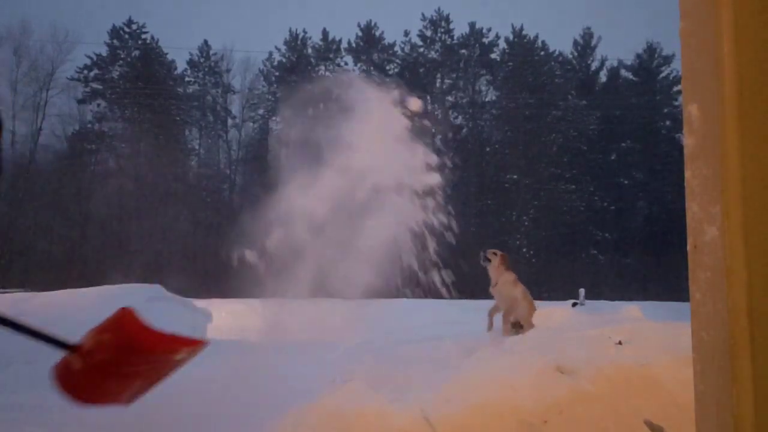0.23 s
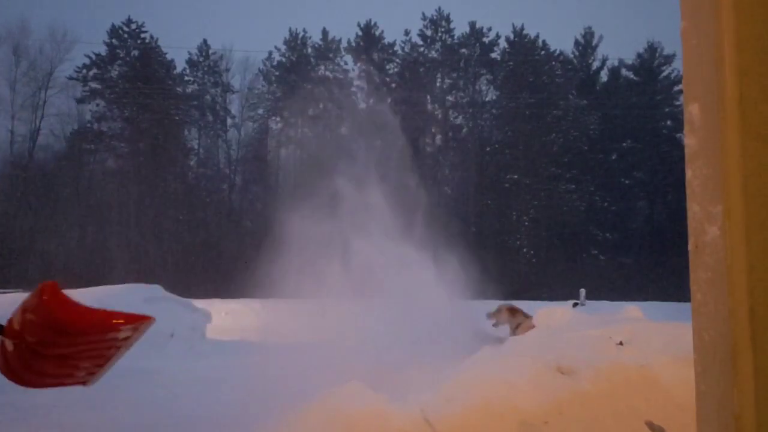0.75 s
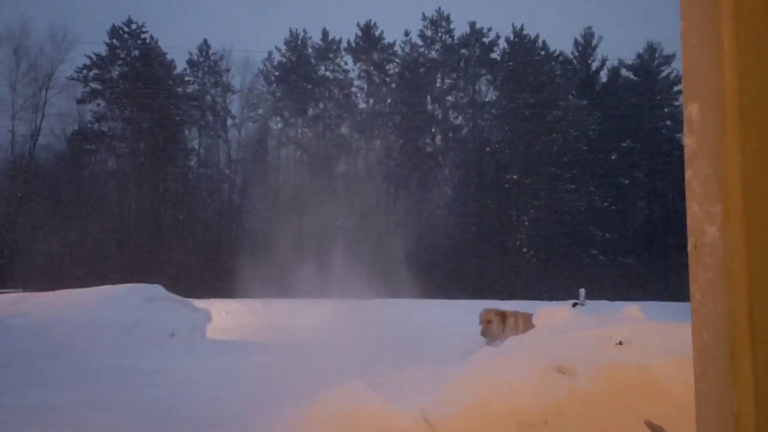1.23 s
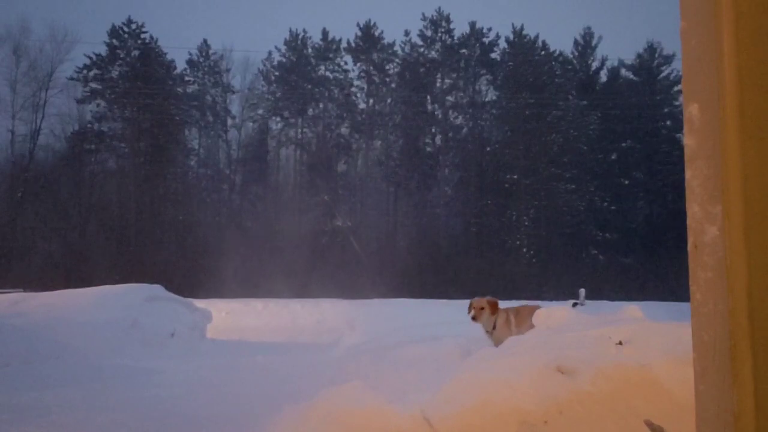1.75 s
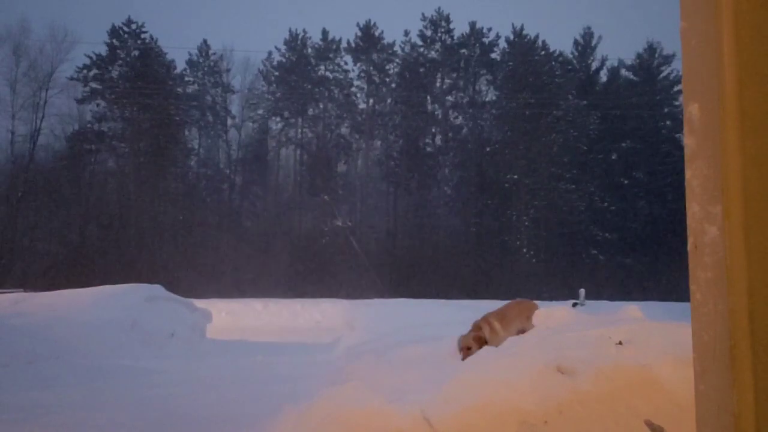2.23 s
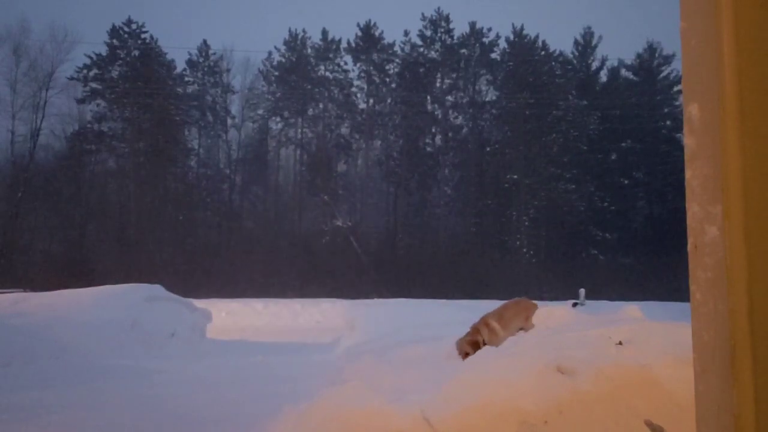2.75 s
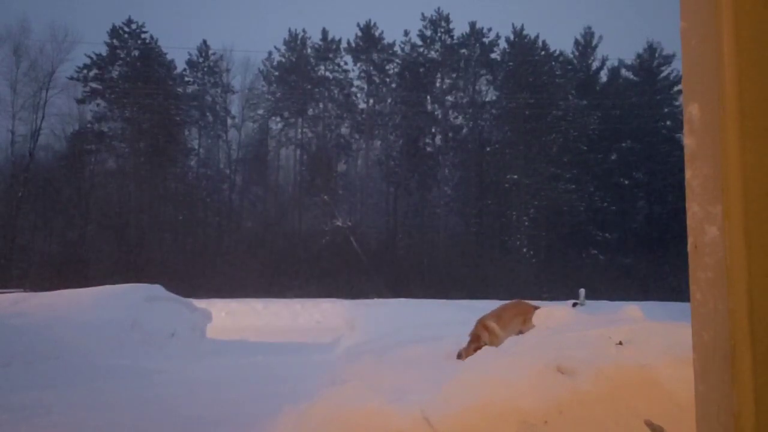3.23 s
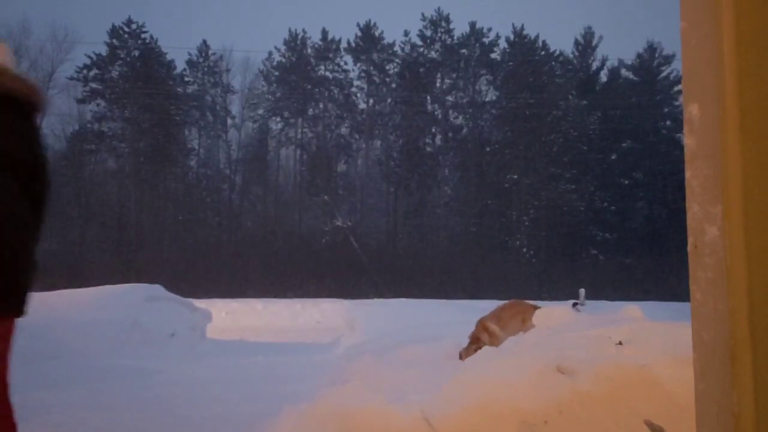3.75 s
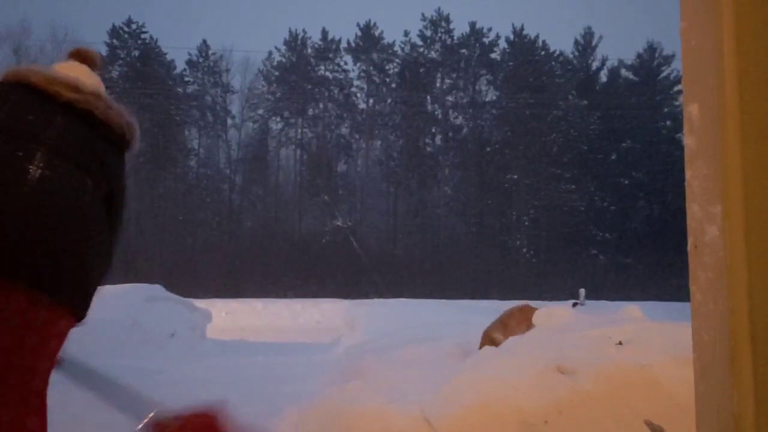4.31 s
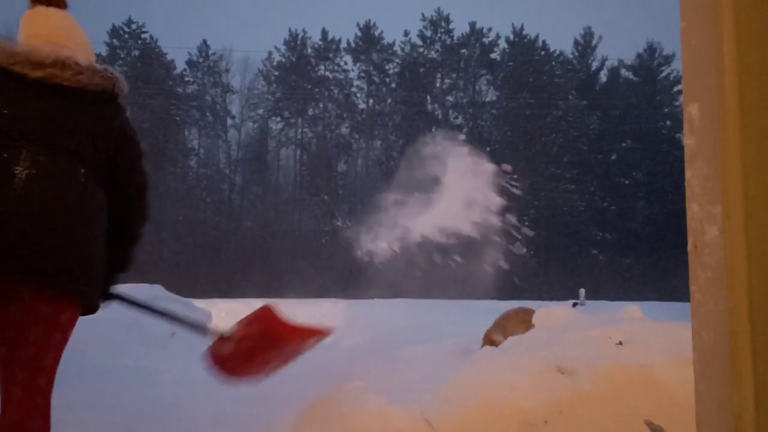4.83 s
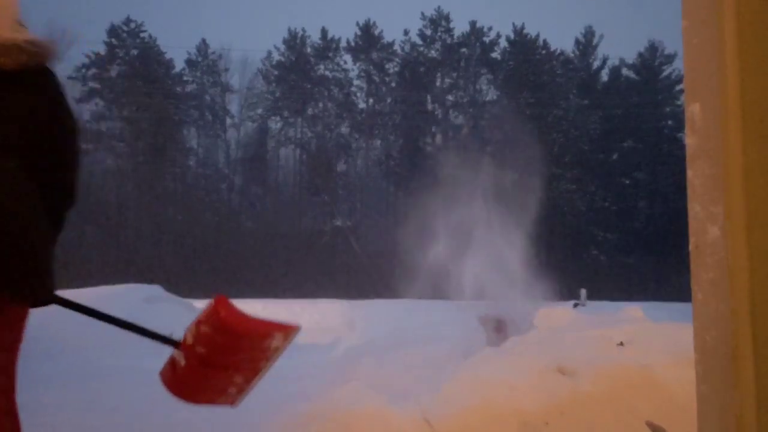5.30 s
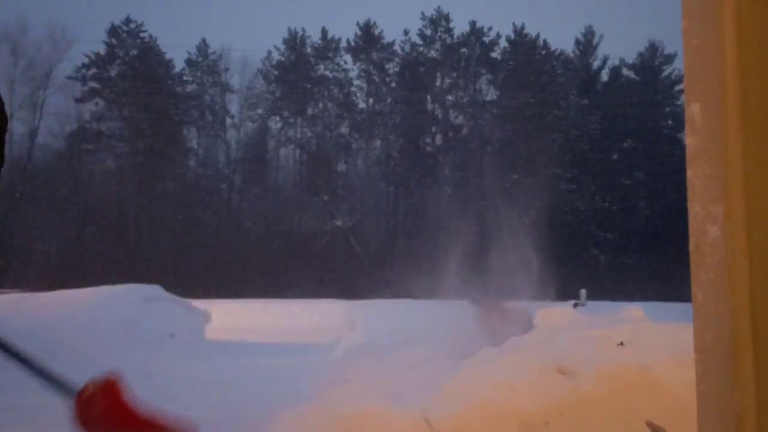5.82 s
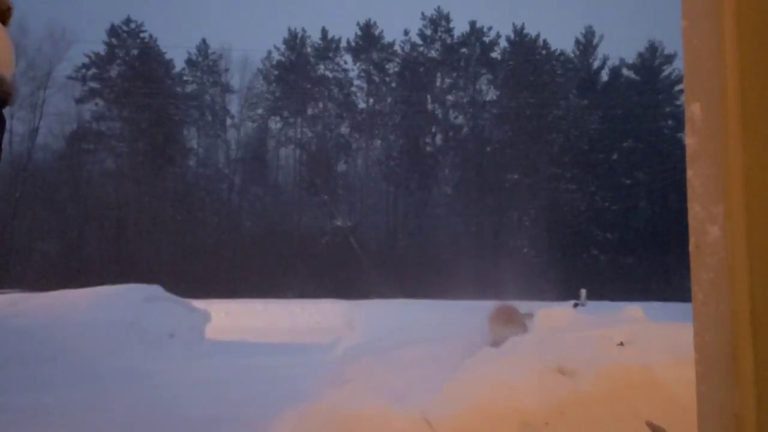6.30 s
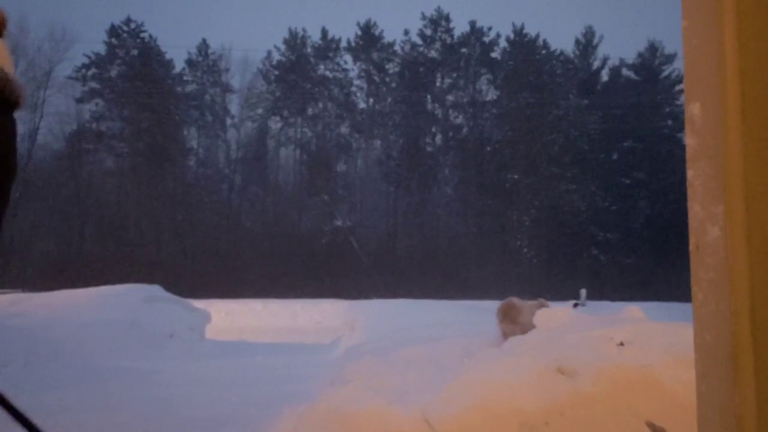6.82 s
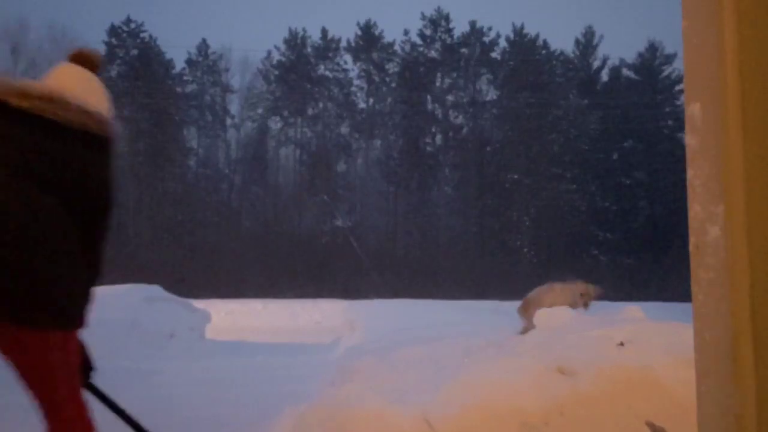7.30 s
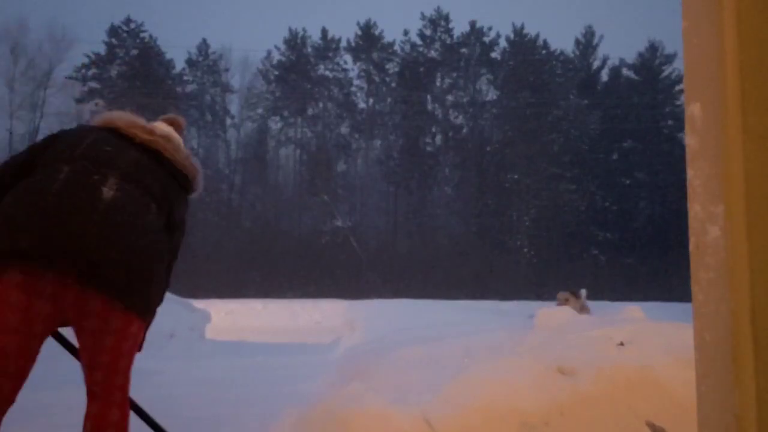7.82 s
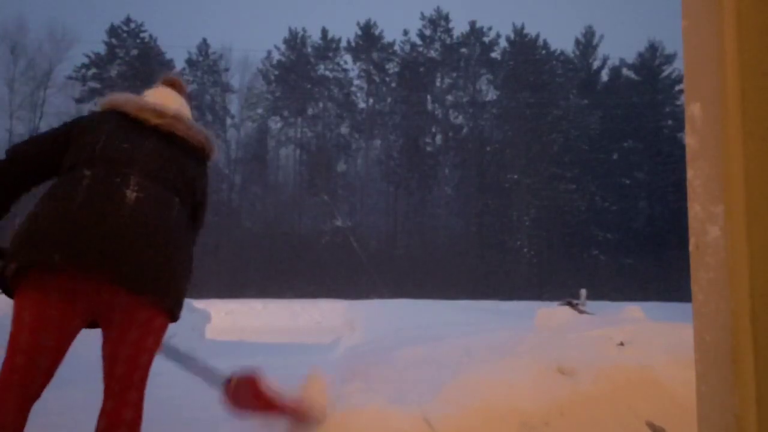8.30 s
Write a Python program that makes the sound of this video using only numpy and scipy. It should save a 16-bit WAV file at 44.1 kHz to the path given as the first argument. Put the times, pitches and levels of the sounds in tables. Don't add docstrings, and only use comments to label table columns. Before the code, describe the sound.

Two rough shovel strokes separated by quiet. A hard plastic blade thumps onto packed snow, then grinds in short, crunchy, uneven scrapes with bright icy ticks. Boots shift dully and a loose shaft fitting clicks. A second landing is lighter, but its push grows into a heavier, knocking scrape and a loud scooping release. Falling powder fades out. Open quiet yard, nearby stereo microphone, thin hiss and distant low rumble.

```python
import sys
import numpy as np
from scipy import signal
from scipy.fft import rfft, irfft, next_fast_len
from scipy.io import wavfile
from scipy.ndimage import uniform_filter1d, map_coordinates

SR = 44100
rng = np.random.default_rng(int(sys.argv[2]) if len(sys.argv) > 2 else 0)


def pcm_store(signal):
    levels = np.round(np.clip(np.atleast_2d(signal), -1, 1) * 32767)
    wavfile.write(sys.argv[1], SR, levels.astype(np.int16).T)


def ratio_of_db(decibels):
    return 10 ** (np.asarray(decibels, float) / 20)


N = 377055
M = next_fast_len(N + 8192)
HZ = np.fft.rfftfreq(8192, 1 / SR)
FULL_HZ = np.fft.rfftfreq(M, 1 / SR)
LAG_SAMPLES = 9.35


def unit(x):
    return x / np.sqrt(np.mean(x ** 2) + 1e-20)


def along(points, hz):
    f, v = np.transpose(points)
    return np.interp(np.log(hz + 1), np.log(f + 1), v)


def wobble(rate_hz):
    knot = np.arange(0, N + 64, 64) * min(rate_hz, 400) / SR
    slow = map_coordinates(rng.standard_normal(4000), [knot])
    return np.interp(np.arange(N), np.arange(len(slow)) * 64, slow)


def causal(gain):
    floored = np.maximum(gain / np.sqrt(np.mean(gain ** 2)), 1e-6)
    cepstrum = irfft(np.log(floored))
    half = len(cepstrum) // 2
    cepstrum[1:half] *= 2
    cepstrum[half + 1:] = 0
    return rfft(irfft(np.exp(rfft(cepstrum))), M)


def radiate(force, gain, alike, lag_samples):
    turn = np.arccos(np.clip(along(alike, FULL_HZ), -1, 1)) / 2
    a, b = rfft(force, M) * causal(gain) * [np.cos(turn), np.sin(turn)]
    ramp = np.exp(-1j * np.pi * FULL_HZ * lag_samples / SR)
    return irfft([(a + b) * ramp, (a - b) / ramp], M)[:, :N]


def swell(s, peak_s, rise_s, fall_s):
    return -20 * np.maximum((peak_s - s) / rise_s, (s - peak_s) / fall_s)


def add_note(out, s, hz, db, t60_s, rise_s, rough):
    t = np.arange(round(min(t60_s, 1) * SR)) / SR
    wander = rough * np.cumsum(rng.standard_normal(len(t)))
    note = np.sin(2 * np.pi * hz * t + wander) * (1 - np.exp(-t / rise_s))
    out[round(s * SR):][:len(t)] += ratio_of_db(db - 60 * t / t60_s) * note


# (frequency [Hz], density [dB per Hz])
SCOOP_COLOUR = [(60, -49), (120, -11.5), (240, -4), (330, 4), (390, 4.5), (470, -2), (700, -4), (820, -3.5),
                (1100, -43.5), (2000, -81)]
CRUNCH_COLOUR = [(400, -62.5), (650, -16), (800, -9), (1100, -6), (1250, -5), (2100, -10.5), (2400, -14),
                 (3200, -31.5), (6000, -100)]
RUSTLE_COLOUR = [(500, -70), (850, -9), (1200, -2), (2000, 0), (2400, -12), (4000, -80)]
EDGE_COLOUR = [(1200, -59.5), (1900, -21), (2250, -7), (3000, -3), (4100, -4), (5000, -8), (6300, -8.5),
               (7300, -9), (8000, -17), (9000, -36.5), (13000, -89.5)]
POWDER_COLOUR = [(5000, -69.5), (7400, -13.5), (8100, -0.5), (10000, 3.5), (13400, 4.5), (14500, 1),
                 (15500, 5), (17000, -26.5)]
# (frequency [Hz], width [Hz], level [dB])
BLADE_MODES = [(176, 40, 3.5), (238.3, 22, 9.5), (389, 4.1, -6.5), (460, 11, 11), (552.6, 72, 5.5),
               (721, 13, -0.5), (884.4, 46, 8), (1068, 93, -2), (1314, 9, -1), (1730, 13, -13.5),
               (2695, 58, -5.5), (4030, 130, -11)]
# (frequency [Hz], left-right likeness [1])
NEAR_LIKENESS = [(60, 0.32), (150, 0.97), (300, 1), (640, 0.46), (1400, 0.79), (3000, 0.19), (7000, 0.17),
                 (15000, 0.067)]


def shovel():
    slide_s = np.arange(0, N / SR, .002)
    time_s = hushed_time()
    scoop, crunch, edge, powder = [np.interp(time_s, slide_s, c) for c in sliding(slide_s)]
    judder = wobble(13)
    coarse = grains(per_s=700, spread_db=1.2, life_s=0.003)
    fine = grains(per_s=3000, spread_db=.8, life_s=0.001)
    modes = sum(ratio_of_db(db) / (1 + (2 * (HZ - mid) / width) ** 2) for mid, width, db in BLADE_MODES)
    panels = 1 + 1.07 * modes
    shaking = patchy(depth_db=2.1)
    loaded = 1 / (1 + (ratio_of_db(-64.0) / scoop) ** 2)
    light = 1 - loaded

    scoop_slide = scoop * ratio_of_db(0.2 * judder + 1.3 * wobble(40)) * coarse
    grit = crunch * ratio_of_db(0.23 * judder + .9 * wobble(40)) * coarse
    edge_slide = edge * ratio_of_db(0.56 * judder + 0.47 * wobble(50)) * fine
    powder_slide = powder * ratio_of_db(0.29 * judder + .4 * wobble(90)) * fine

    knock = ratio_of_db(-11.0) * blows(1, 1.1, 1.5)
    scoop_knock = ratio_of_db(-14.5) * blows(2, 0.71, -12)
    edge_knock = ratio_of_db(-3.0) * blows(3, 0.76, 7.7)
    powder_knock = ratio_of_db(-24.0) * blows(3, 1.0, 12.0)

    parts = [
        (SCOOP_COLOUR, scoop_slide, scoop_knock, snaps(2, 5.6)),
        (CRUNCH_COLOUR, grit * np.sqrt(loaded), knock * loaded, np.sqrt(loaded) * snaps(1, 3)),
        (RUSTLE_COLOUR, grit * np.sqrt(light), knock * light, np.sqrt(light) * snaps(1, 2.2)),
        (EDGE_COLOUR, edge_slide, edge_knock, snaps(3, 6)),
        (POWDER_COLOUR, powder_slide, powder_knock, snaps(3, -4.5))]
    out = 0
    for colour, slide, hit, push in parts:
        force = np.sqrt(slide ** 2 + hit) * shaking + push
        out = out + radiate(force, ratio_of_db(along(colour, HZ)) * panels, NEAR_LIKENESS, LAG_SAMPLES)
    return out


def hushed_time():
    time_s = np.arange(N) / SR
    landings_s, landing_hold_s, hold_s = [2.186, 6.197], .09, .026
    hits = sorted(row[0] for row in KNOCKS)
    for last, hit in zip([0] + hits, hits):
        if hit - last > .03:
            start = hit - (landing_hold_s if hit in landings_s else hold_s)
            time_s[(time_s > start) & (time_s < hit)] = start
    return time_s


def grains(per_s, spread_db, life_s):
    chance, size = rng.random((2, N))
    breaks = (chance < per_s / SR) * ratio_of_db(-spread_db * np.log(1 - size))
    power = signal.lfilter([1], [1, -np.exp(-1 / (life_s * SR))], breaks ** 2)
    return unit(np.sqrt(np.abs(power) + 1e-9))


def patchy(depth_db):
    z = signal.stft(rng.standard_normal((2, N)), nperseg=1024)[2]
    field = uniform_filter1d(rng.standard_normal(z.shape[1:]), size=3, axis=0)
    field = uniform_filter1d(field, size=6, axis=1)
    return unit(signal.istft(z * ratio_of_db(depth_db * unit(field)), nperseg=1024)[1][:, :N])


# (time [s], pressure [dB], brightness [dB])
PUSHES = [
    [(2.57, -66.5, -1), (2.605, -47, 0), (2.665, -31.5, 1), (2.688, -43, 0.5), (2.718, -31.5, -1.5),
     (2.75, -36, -3), (2.78, -44, -5.5), (2.9, -62, -4.5)],
    [(2.98, -70, -3), (3.1, -40, -3.5), (3.19, -40, -2.5), (3.31, -41.5, -2), (3.43, -45.5, 6),
     (3.62, -45, -4), (3.86, -49, 9), (3.98, -46, 7), (4.03, -64, 11)],
    [(6.28, -61, -10), (6.34, -46.5, 4.5), (6.42, -48, 0), (6.55, -40.5, 1), (6.8, -41, -2.5),
     (7.1, -40.5, 5), (7.34, -39, -0.5), (7.45, -49, 6), (7.57, -76, 0)],
]
# (peak time [s], level [dB], brightness [dB], rise [s], fall [s])
SURGES = [(2.2, -30, -8.5, 0.012, 0.048), (2.271, -34, -5.5, 0.028, 0.061),
          (2.34, -53.5, -15.5, 0.098, 0.23), (2.32, -57.5, 2.5, .05, 0.26), (3.2, -37.5, -0.5, .06, .06),
          (3.25, -45, -4.5, 0.028, .06), (3.305, -41.5, -2, 0.046, .06), (3.365, -40, -1, 0.061, 0.03),
          (3.71, -47.5, 4, .06, .08), (3.47, -34, 0, 0.049, 0.066), (3.57, -39, -4, 0.059, 0.071),
          (3.88, -38.5, 4, 0.025, 0.068), (4.17, -52, -4, 0.025, 0.16), (4.21, -53.5, 2.5, 0.056, 0.1),
          (6.222, -41, -2.5, 0.04, 0.046), (6.27, -53, 3.5, 0.044, .15), (4.08, -58, 4, 0.13, 0.062),
          (6.571, -33, -2, 0.028, 0.21), (6.7, -37, 1, 0.12, 0.2), (6.86, -33.5, 4, 0.061, 0.14),
          (6.9, -38, 5.5, 0.041, 0.084), (6.949, -34, -3.5, 0.092, 0.086), (7.021, -36, -0.5, 0.062, 0.11),
          (7.171, -28, -1.5, 0.13, 0.22), (7.239, -22.5, -4, 0.06, 0.04), (7.38, -44, -7.5, 0.13, 0.0795),
          (7.72, -54, 5.5, 0.28, 0.13)]
# (peak time [s], level [dB], brightness [dB], rise [s], fall [s])
PATTER = [(.02, -74.5, 15.5, 0.11, .3), (.19, -62, -0.5, 0.06, 0.49), (.31, -58.5, 4.5, 0.075, .08),
          (.45, -58.5, -2, 0.055, 0.27), (.645, -57, -7.5, 0.053, 0.097), (1.07, -59, -4, 0.058, 0.12),
          (.53, -65, 1, 0.073, .06), (4.57, -62.5, 14, 0.14, 0.075), (5.07, -56, 4.5, 0.018, 0.13),
          (5.313, -62, 22.5, .01, 0.026), (5.42, -65.5, -5, .1, 0.18), (6.05, -73, -12.5, 0.21, .4),
          (5.335, -54, 0, 0.082, 0.16), (8.03, -72, 4, 0.09, 0.16), (5.86, -60, -3.5, 0.026, 0.084),
          (8.5, -61, 6.5, 0.17, 0.17)]
# (time [s], level [dB])
DRIFT = [(0, -76), (.7, -75), (1.24, -86), (1.85, -86), (2.1, -93), (4.4, -74), (5.6, -94), (7.9, -83.5),
         (8.55, -71.5)]
# (level over pressure [dB], slope [dB per dB brightness])
LOADED = [(-1.1, -0.67), (-0.5, 0.01), (-4, 0.58), (-14, 0.76)]
EMPTY = [(-9, -0.81), (-1.3, 0.12), (-3, 0.54), (-16, 1.33)]
# (level [dB], t60 [s])
PORCH = [(-7.5, 0.67), (-14.5, 0.62), (-12, 0.78), (-10.5, 0.55)]
IDLE_DB = [-75, -92, -83]


def sliding(s):
    def answer(law, db, bright_db):
        return ratio_of_db([db + over + slope * bright_db for over, slope in law]) ** 2

    power = 0
    for push in PUSHES:
        t, db, bright_db = np.transpose(push)
        power = power + answer(LOADED, np.interp(s, t, db, -200, -200), np.interp(s, t, bright_db))
    for law, bursts in [(LOADED, SURGES), (EMPTY, PATTER)]:
        for peak_s, db, bright_db, rise_s, fall_s in bursts:
            power = power + answer(law, db + swell(s, peak_s, rise_s, fall_s), bright_db)

    lingering = []
    for p, (db, t60_s) in zip(power, PORCH):
        keep = ratio_of_db(-120 * (s[1] - s[0]) / t60_s)
        lingering.append(p + ratio_of_db(db) ** 2 * signal.lfilter([1 - keep], [1, -keep], p))

    settle_db, settle_s = -27.5, 0.077
    settle = sum(ratio_of_db(db + settle_db + swell(s, at, 0.015, settle_s)) ** 2 for at, db, hz, t60_s in THUDS)
    drift = ratio_of_db(np.interp(s, *np.transpose(DRIFT))) ** 2
    idle = [ratio_of_db(db) ** 2 for db in IDLE_DB] + [drift]
    total = [p + i for p, i in zip(lingering, idle)]
    total[0] = total[0] + settle
    return np.sqrt(total)


# (time [s], peak [dB], scoop [dB], edge [dB], ring frequency [Hz])
BLADE_KNOCKS = [(2.186, -30, 4, -8, 308), (2.193, -32, 2, -14, 430), (2.254, -29, 1, -6.5, 301),
                (2.698, -36, 2, -8, 700), (2.716, -32, 6, -6, 780), (3.182, -38, -4, -8, 1070),
                (3.24, -35, 0, -12, 920), (3.553, -43, 7, -14, 441), (3.627, -42, 6, -14, 300),
                (3.459, -24, 0.5, -10, 804), (3.571, -27.5, -9, -34, 1254), (3.877, -29, -6, -2.5, 559),
                (3.961, -44, 7, -11, 945), (6.197, -43.5, 3, -1, 600), (6.207, -40, 5, -10, 480),
                (6.472, -41, -3, -8, 1100), (6.556, -30, -13.5, -18.5, 809), (6.85, -27, -5, -7.5, 810),
                (6.859, -23, -17, -9, 780), (6.888, -26, -11.5, -7, 349), (6.932, -34, 0, -10, 700),
                (7.024, -32, -5.5, -10, 1130), (7.226, -22.5, 4.5, -16.5, 389.5),
                (7.173, -26, -5, -12, 1000), (7.335, -38, 5, -15, 471), (7.448, -50, 5, -12, 396)]
TAPS = [
    (0.172, -46, -17, -20.5, 930),
    (0.298, -41.5, -27, -6.5, 1330),
    (0.633, -59, 3, -9, 1055),
    (1.047, -66, -9, -19, 1330),
    (4.164, -44.5, 6, -11.5, 293),
    (4.204, -45, 3.5, -7, 440),
    (5.06, -50, -20, -3, 1358),
    (5.323, -46, -25, -6, 1104),
    (7.652, -47, 1.5, -5.5, 202),
    (7.701, -45.5, 2, -9, 247),
]
DRY_KNOCKS = [
    (2.646, -42, -8, 0.5, 542),
    (3.042, -50, 7, -14, 449),
    (3.138, -39.5, 1, -8, 460),
    (3.353, -42, 4.5, -2.5, 460),
    (3.877, -41.5, 0.5, 2, 547),
    (5.309, -57, -8, 1, 199),
    (7.148, -34.5, 6, -10, 393),
    (7.283, -37, -15, 1.5, 501),
    (7.295, -37, -7, 0, 520),
    (7.382, -39.5, 6, -22, 383),
]
BLADE_T60_S, TAP_T60_S, DRY_T60_S = 0.075, 0.059, 0.057
KNOCK_KINDS = [(BLADE_KNOCKS, BLADE_T60_S), (TAPS, TAP_T60_S), (DRY_KNOCKS, DRY_T60_S)]
KNOCKS = [(*row, t60_s) for rows, t60_s in KNOCK_KINDS for row in rows]


def knock_db(row, column):
    return row[1] + (row[column] if column > 1 else 0)


def blows(column, speed, crack_db):
    power = np.zeros(N + SR)
    t = np.arange(SR // 4) / SR
    crack = ratio_of_db(crack_db - 60 * t / 0.0099) ** 2
    for row in KNOCKS:
        shudder = ratio_of_db(-60 * t * speed / row[5]) ** 2
        power[round(row[0] * SR):][:len(t)] += ratio_of_db(knock_db(row, column)) ** 2 * (shudder + crack)
    return power[:N]


def snaps(column, click_db):
    push = np.zeros((2, N))
    for row in KNOCKS:
        dryness = (0.05 / row[5]) ** 2
        push[0, round(row[0] * SR) + 40] = ratio_of_db(knock_db(row, column) + click_db) * dryness
    return push


# (time [s], frequency [Hz], level [dB], t60 [s])
BLADE_RING = [(2.19, 235, -30, 0.52), (2.19, 297, -30, 0.58), (2.19, 440, -29.5, 0.59),
              (2.255, 510, -34.5, .5), (2.225, 565, -29, .25), (2.19, 325, -22, 0.079),
              (2.26, 340, -34, .3), (2.255, 250, -30.5, .35), (2.2, 130, -36.5, 0.39),
              (2.195, 190, -31, .3), (2.19, 745, -29.5, .3), (2.19, 880, -33, 0.16),
              (2.19, 1020, -30.5, 0.14)]
# (time [s], frequency [Hz], level [dB], t60 [s])
POPS = [(2.192, 396, -15, 0.02), (2.2, 870, -23, .03), (3.876, 500, -17, 0.017), (4.204, 520, -31.5, .03),
        (7.382, 400, -16.5, 0.021), (3.9, 456, -25.5, .02), (7.236, 570, -12, 0.02), (3.46, 3600, -30, .02),
        (6.85, 900, -18, .015), (6.863, 1050, -21.5, .05), (3.58, 1450, -28, .05), (3.245, 920, -27.5, .06),
        (6.935, 700, -30, .04), (7.175, 950, -24.5, .05), (7.23, 800, -15.5, 0.04), (6.575, 800, -25, .06),
        (2.705, 380, -26.5, 0.087), (2.72, 280, -29, .15)]
# (time [s], frequency [Hz], level [dB], t60 [s])
OVERTONES = [(.19, 1720, -56, .2), (2.254, 3700, -34, .07), (2.647, 4300, -35, .05), (3.887, 2750, -34, .2),
             (5.325, 1250, -52, .15), (5.325, 1900, -54, .2), (1.849, 270, -46, .07),
             (5.224, 210, -47, .06), (5.224, 540, -56, .04), (3.575, 1500, -36, .08),
             (3.46, 3150, -37, .07), (3.877, 5400, -31, .03), (7.228, 660, -17, .09),
             (2.192, 520, -19, .07), (3.877, 320, -24, .06), (6.215, 235, -32, .18), (7.229, 400, -20, .09)]


def ring_blade(out):
    for s, db, scoop_db, edge_db, hz, t60_s in KNOCKS:
        low_db = scoop_db if hz < 800 else 0
        add_note(out, s, hz, db + low_db + 0.5, 1.66 * t60_s, rise_s=0.0024, rough=0.063)
    for s, hz, db, t60_s in BLADE_RING + POPS:
        add_note(out, s, hz, db, t60_s, rise_s=.001, rough=0.018)
    for s, hz, db, t60_s in OVERTONES:
        add_note(out, s, hz, db, t60_s, rise_s=0.0013, rough=0.054)


# (time [s], peak [dB], frequency [Hz], t60 [s])
THUDS = [
    (0.96, -47.5, 62, 0.12),
    (1.846, -44, 136, 0.092),
    (2.184, -19.5, 300, 0.049),
    (5.224, -39, 260, 0.035),
    (5.399, -46, 248, 0.05),
    (5.6, -43, 210, 0.032),
    (2.19, -36.5, 90, 0.28),
    (.355, -58, 370, .1),
    (5.843, -39, 151, 0.076),
    (5.883, -40.5, 151, 0.066),
]


def thud(out):
    for s, db, hz, t60_s in THUDS:
        add_note(out, s, hz, db + 0.5, t60_s, rise_s=0.0019, rough=0.038)


# (time [s], frequency [Hz], level [dB])
TICKS = [(2.596, 3760, -41), (2.646, 9300, -30.5), (2.697, 3950, -31.5), (3.035, 3880, -48),
         (3.067, 3950, -41), (3.137, 3620, -37), (3.21, 3420, -38), (3.351, 4240, -35), (3.452, 4110, -35),
         (3.573, 1300, -26.5), (3.7, 4100, -42), (3.962, 4800, -40), (5.324, 1210, -38),
         (5.324, 3300, -45.5), (6.314, 3280, -44.5), (6.335, 4040, -42), (6.562, 3600, -36),
         (6.677, 4120, -33), (6.815, 3140, -38.5), (6.85, 3700, -26.5), (6.85, 5380, -28),
         (6.86, 5900, -28.5), (6.888, 4200, -30), (6.896, 3600, -32), (7.016, 6000, -32.5),
         (7.175, 3400, -29.5), (7.188, 3000, -31), (7.2, 3310, -31), (7.228, 3910, -24.5),
         (7.282, 4810, -28.5), (7.291, 2970, -29), (7.688, 3920, -48), (7.711, 2800, -44),
         (3.877, 5300, -26.5)]


def tick(out):
    t60_s, upper_ratio, upper_db = .016, 1.45, -5.5
    for s, hz, db in TICKS:
        add_note(out, s, hz, db, t60_s, rise_s=.0003, rough=.2)
        add_note(out, s, hz * upper_ratio, db + upper_db, t60_s, rise_s=.0003, rough=.2)


# (time [s], frequency [Hz], level [dB], t60 [s])
RATTLES = [(5.059, 1355, -42.5, 0.094), (5.066, 1865, -45, .12), (5.09, 1830, -57, .5),
           (5.09, 1340, -60, .35), (5.062, 920, -53, .12), (5.064, 3935, -49, .1), (5.068, 4400, -54, .1),
           (.171, 1670, -42, 0.1), (3.574, 1480, -30, .07), (5.321, 1790, -41, 0.099),
           (5.345, 1250, -54, .15), (5.853, 1320, -55, .12), (6.214, 1020, -39, 0.093)]


def rattle(out):
    for s, hz, db, t60_s in RATTLES:
        add_note(out, s, hz, db, t60_s, rise_s=.004, rough=.015)


# (start [s], end [s], start frequency [Hz], end frequency [Hz], level [dB])
SINGING = [
    (2.585, 2.63, 3700, 3530, -46),
    (2.69, 2.75, 4090, 3900, -39.5),
    (3.17, 3.27, 3620, 4100, -51),
    (6.32, 6.47, 4090, 4000, -55),
    (6.67, 6.73, 4300, 4220, -46),
    (6.85, 6.95, 2650, 2500, -46),
    (8.45, 8.55, 1080, 930, -60.5),
]
WHISTLES = [
    (3.03, 3.42, 4000, 4200, -50),
    (6.6, 6.76, 4720, 6200, -52),
    (0.4, .56, 3400, 2800, -64.5),
    (.44, .6, 2240, 2100, -70),
    (1.04, 1.13, 3300, 3200, -71),
    (7.6, 7.63, 3940, 3970, -60),
    (.43, .55, 2900, 2600, -62),
]
CREAKS = [
    (0.085, 0.18, 1570, 1730, -66),
    (0.3, 0.41, 1330, 1300, -69),
    (3.1, 3.3, 890, 1100, -50.5),
    (.24, 0.3, 1330, 1270, -71),
    (.63, .71, 1400, 1420, -70),
    (5.53, 5.84, 2790, 2770, -78.5),
    (4.72, 5.05, 2780, 2760, -85),
    (.43, .49, 1200, 1300, -68),
]
CHIRPS = [
    (8.37, 8.53, 1400, 1230, -67.5),
    (5.15, 5.3, 1830, 1780, -76),
    (5.3, 5.5, 1830, 1500, -78),
]
WHINES = [
    (5.45, 5.85, 1750, 1740, -81),
    (5.86, 6.17, 2800, 2800, -85),
    (4.4, 6.15, 1600, 1740, -86),
    (1, 1.6, 2550, 2600, -88),
    (1.55, 2.1, 2500, 2500, -86),
    (1.2, 1.5, 1750, 1720, -87),
]
GLIDE_KINDS = [(CREAKS, 111.6, .019), (CHIRPS, 200, .019), (WHISTLES, 1307, .09),
               (WHINES, 220, .04), (SINGING, 350, .04)]


def squeak(out):
    for rows, width_hz, fade_s in GLIDE_KINDS:
        for start, end, hz0, hz1, db in rows:
            length_s = end - start
            t = np.arange(round(length_s * SR)) / SR
            knots = rng.standard_normal((2, 1000))
            fuzz = [map_coordinates(k, [t * min(width_hz, 1600)]) for k in knots]
            phase = 2 * np.pi * np.cumsum(np.interp(t, [0, length_s], [hz0, hz1])) / SR
            gate = np.clip(np.minimum(t, length_s - t) / fade_s, 0, 1)
            gate = gate * ratio_of_db(2.5 * map_coordinates(knots[0, ::-1], [t * 28]))
            tone = (.5 + fuzz[0]) * np.sin(phase) + fuzz[1] * np.cos(phase)
            out[round(start * SR):][:len(t)] += ratio_of_db(db) * gate * tone


def rings():
    out = np.zeros(N + SR)
    for source in (ring_blade, thud, squeak, rattle, tick):
        source(out)
    half_lag = round(LAG_SAMPLES / 2)
    return np.array([np.roll(out[:N], half_lag), np.roll(out[:N], -half_lag)])


# (frequency [Hz], density [dB per Hz])
AIR_COLOUR = [(15, -33.5), (25, -18.5), (60, -14), (100, -9), (120, -6.5), (145, -20), (250, -26.5),
              (600, -31), (800, -37), (1400, -36.5), (1750, -35), (2100, -39.5), (5500, -43.5), (7200, -37),
              (8300, -48), (16000, -39.5)]
# (frequency [Hz], left-right likeness [1])
FAR_LIKENESS = [(25, 0.75), (60, 1), (240, 0.77), (950, 0.068), (3770, 0.45), (15000, -0.34)]
# (frequency [Hz], level [dB])
HUM = [(60, -73.5), (120, -68)]


def evening():
    air_db = -63.5 + 0.55 * wobble(2.04)
    noise = rng.standard_normal((2, N))
    air = ratio_of_db(air_db) * radiate(noise, ratio_of_db(along(AIR_COLOUR, HZ)), FAR_LIKENESS, 4)
    t = np.arange(N) / SR
    sway_db = 3 * np.tanh(wobble(14))
    hum = sum(ratio_of_db(db + sway_db) * np.sin(2 * np.pi * hz * t + 1.65 * wobble(12)) for hz, db in HUM)
    return air + hum


# (frequency [Hz], left minus right [dB])
LEFT_LEAN = [(60, 2.5), (150, -0.5), (600, 3.5), (1500, 2), (5000, 1), (8000, 5.5), (10000, -0.3),
             (15000, 1.5)]


def scene():
    lean_db = along(LEFT_LEAN, FULL_HZ) / 2
    lowest_hz = 60
    small = (1j * FULL_HZ / (lowest_hz + 1j * FULL_HZ)) ** 2
    mix = rfft(shovel() + rings(), M) * small + rfft(evening(), M)
    return irfft(mix * ratio_of_db([lean_db, -lean_db]), M)[:, :N]


def band_limit(x):
    return signal.sosfilt(signal.butter(12, 17000, fs=SR, output="sos"), x)


def record(dry):
    top_hz, above_db = 15850, -25.5
    band = np.where(FULL_HZ < top_hz, 1, ratio_of_db(above_db))
    kept = irfft(rfft(dry, M) * band, M)[:, :N]
    return band_limit(kept)


dry = scene()
out = record(dry)
pcm_store(out)
```